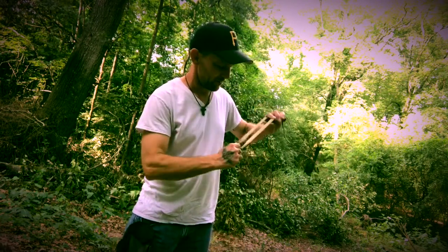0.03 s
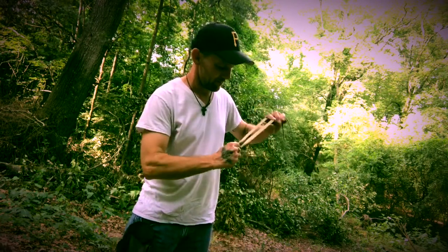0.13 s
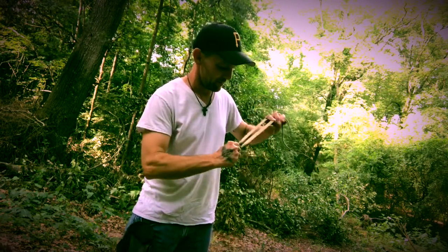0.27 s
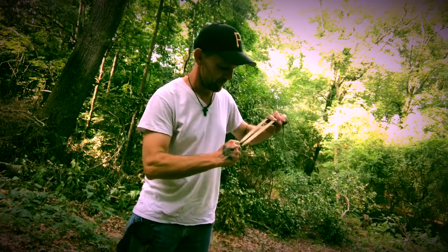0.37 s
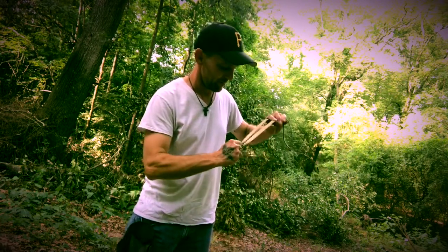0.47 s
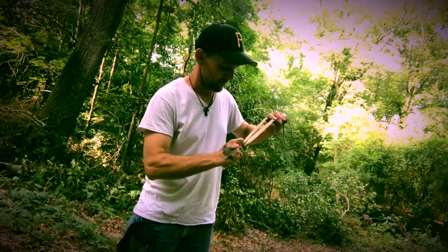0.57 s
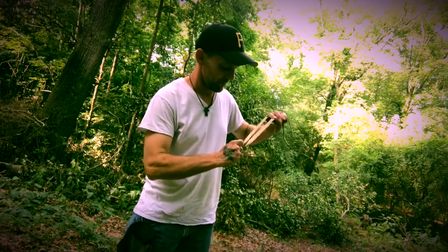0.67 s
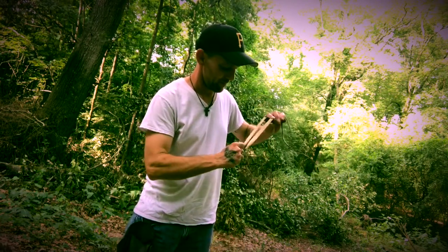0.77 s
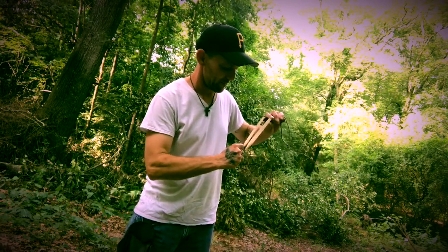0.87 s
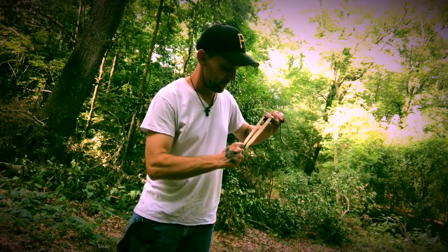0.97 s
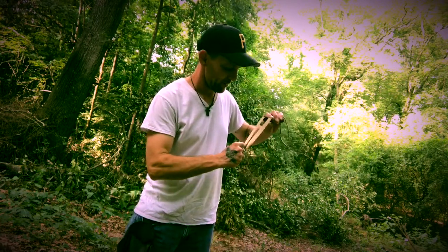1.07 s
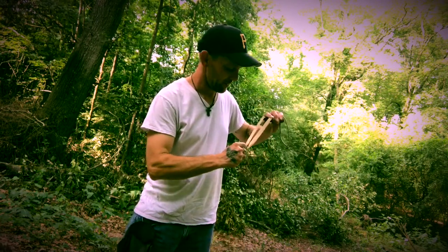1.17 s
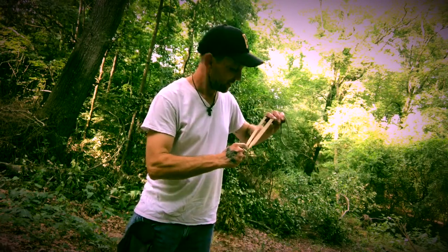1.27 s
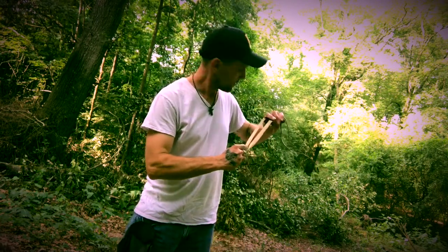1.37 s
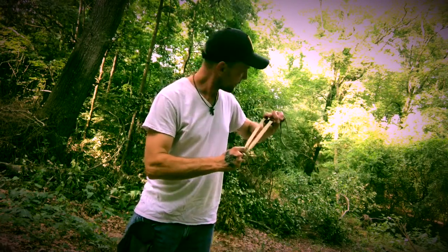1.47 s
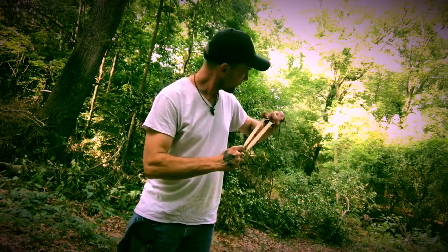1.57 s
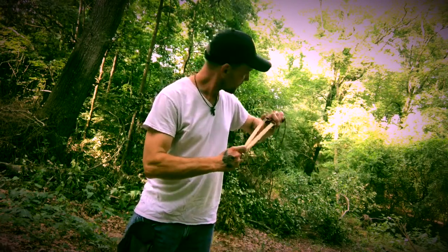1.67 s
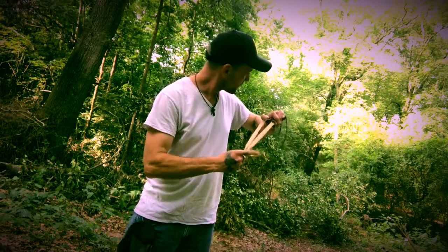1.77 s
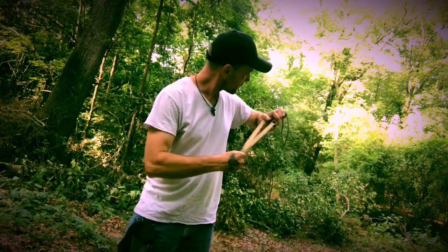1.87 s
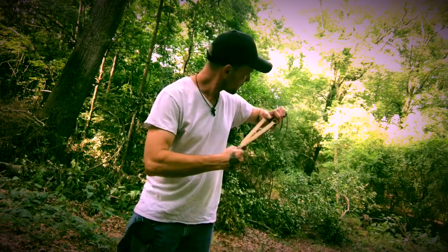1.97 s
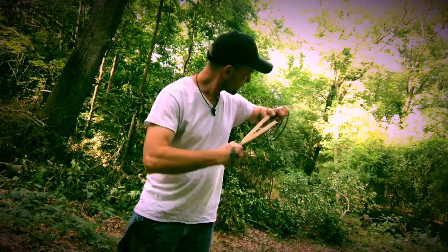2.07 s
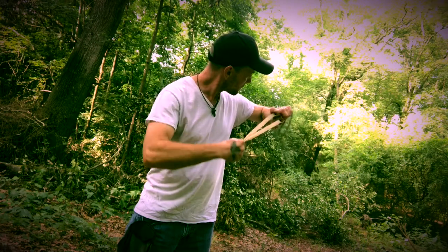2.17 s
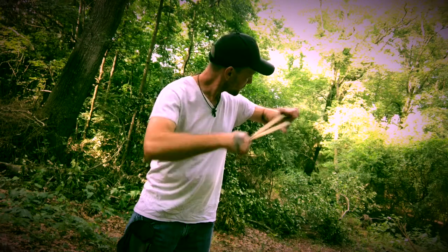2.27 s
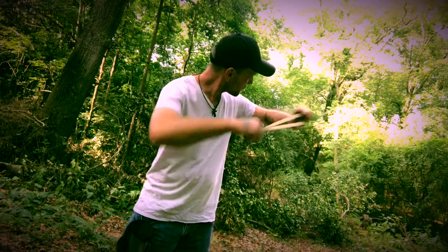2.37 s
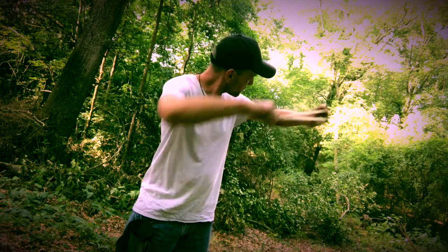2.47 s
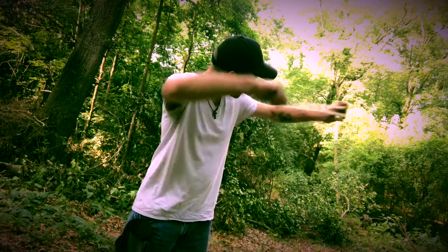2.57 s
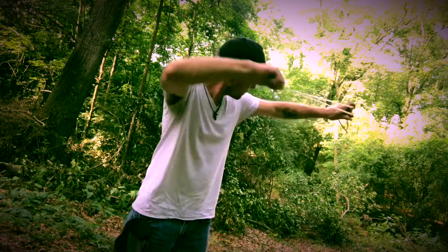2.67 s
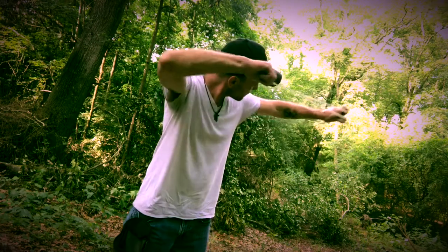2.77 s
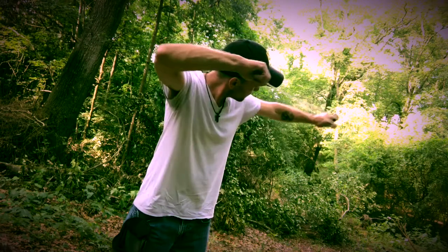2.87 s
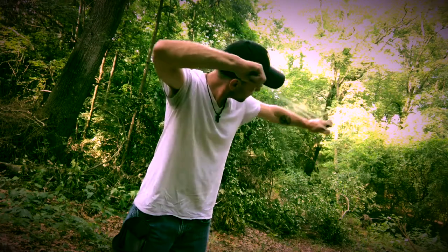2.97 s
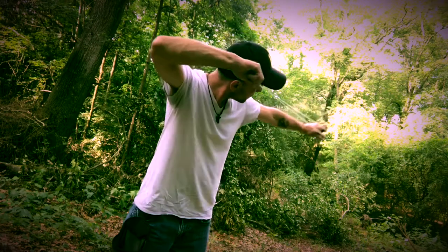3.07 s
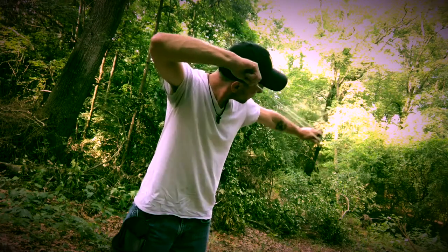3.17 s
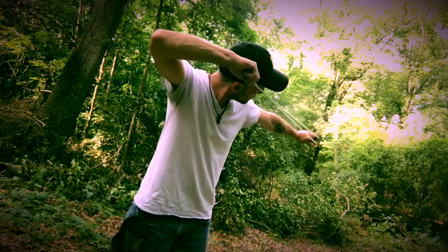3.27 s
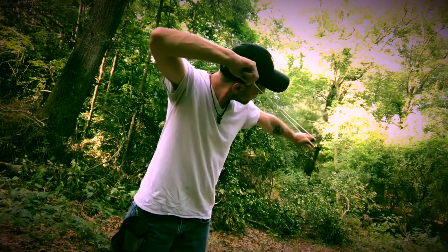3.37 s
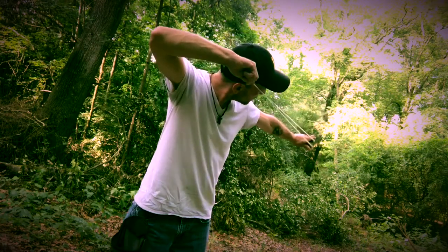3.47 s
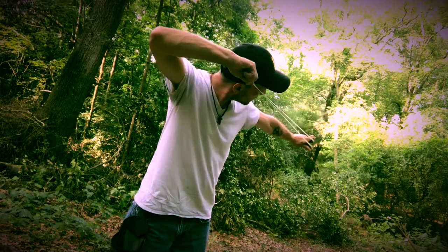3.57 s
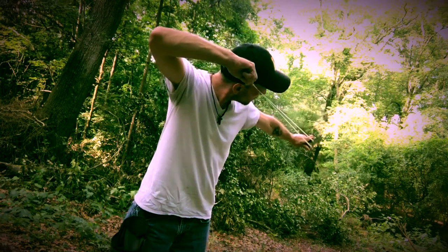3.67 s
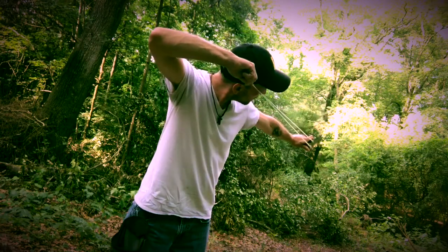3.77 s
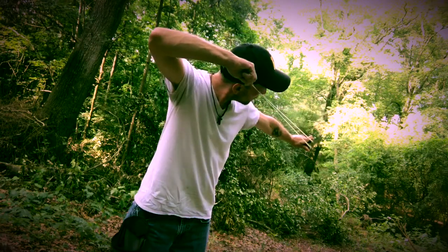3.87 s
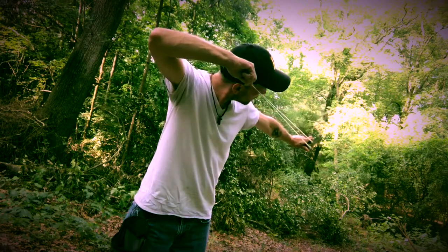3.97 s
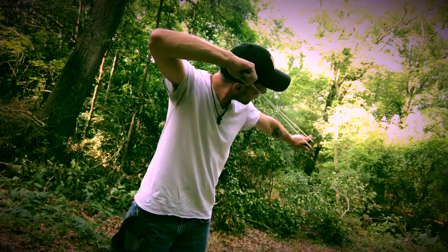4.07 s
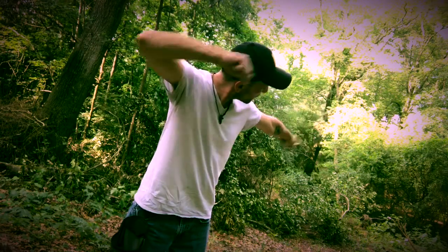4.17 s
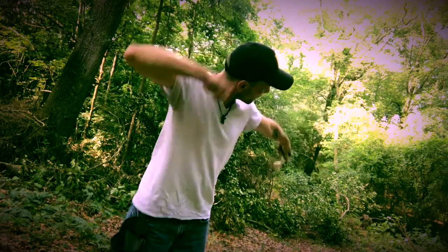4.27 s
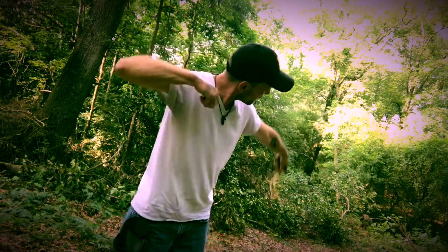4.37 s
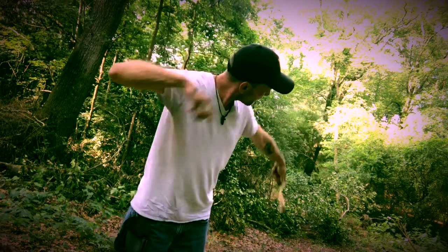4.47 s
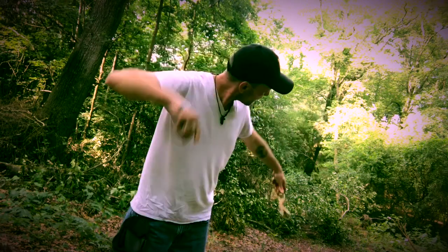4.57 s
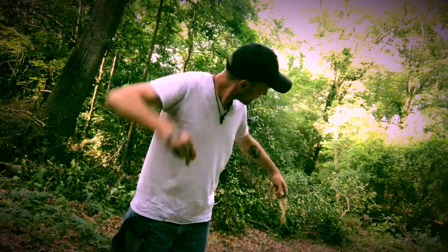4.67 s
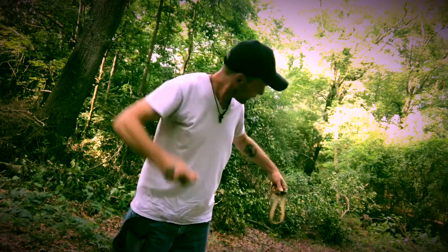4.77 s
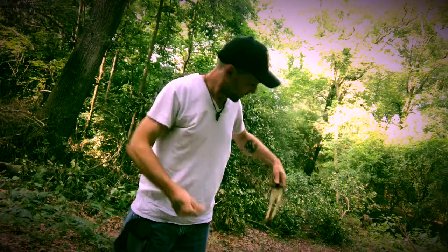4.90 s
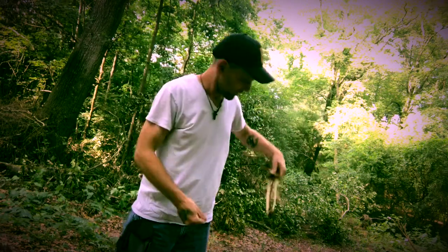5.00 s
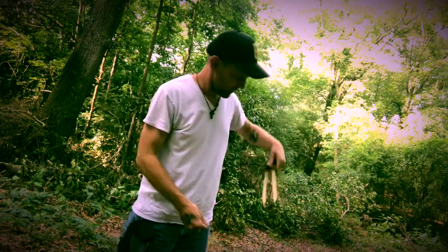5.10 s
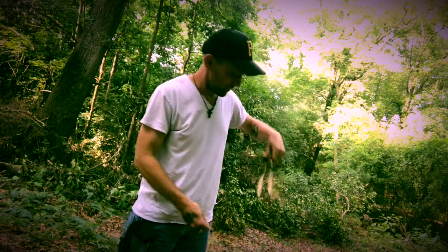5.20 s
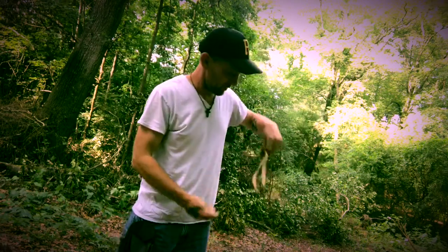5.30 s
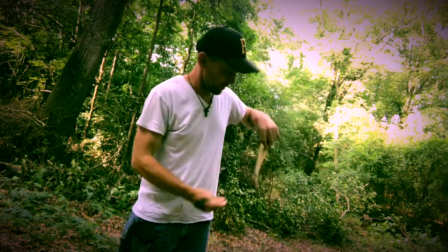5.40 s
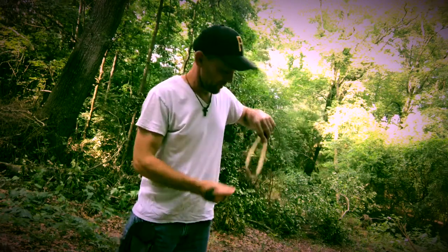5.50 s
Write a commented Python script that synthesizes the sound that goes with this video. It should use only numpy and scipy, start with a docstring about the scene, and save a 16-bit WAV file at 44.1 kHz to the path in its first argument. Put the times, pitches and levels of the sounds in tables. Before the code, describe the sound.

Faint leaf hiss and repeated raspy bird calls, then a sharp rubber-band snap and, a fifth of a second later, a metallic crack with scattered woodland echo.

```python
"""Slingshot and can in the woods

A slingshot is let go: the pouch clicks open, the rubber bands slap through the fork and whip back (short damped
tones and bursts of noise). A fifth of a second later the ball cracks into a far metal can, a set of damped tones
under a burst of noise, and its ring scatters among the trees as shaped noise. A distant bird repeats a hoarse
two-note call (shaking sines with breath) over leaf hiss and a low far rumble (coloured noise) and drone (sines)."""
import sys
import numpy as np
from scipy import signal
from scipy.fft import rfft, irfft, next_fast_len
from scipy.io import wavfile
from scipy.ndimage import map_coordinates

SR = 44100
rng = np.random.default_rng(int(sys.argv[2]) if len(sys.argv) > 2 else 0)


def ratio(d):
    """dB to gain"""
    e = np.asarray(d, float) / 20
    return 10 ** e


def wav_out(sig):
    """Save sig, one row per channel (or a flat mono array), as 16-bit PCM at SR to the path in sys.argv[1]."""
    wavfile.write(sys.argv[1], SR, np.round(np.clip(np.atleast_2d(sig).T, -1, 1) * 32767).astype(np.int16))


N = 244314  # length of the scene in samples
TIME = np.arange(SR // 4) / SR  # a quarter second clock for short sounds, s
HIT_S = 4.4262  # the ball meets the can

# Everywhere below, t60 is the time in which a sound falls by 60 dB.
# the three stages of the shot, release, slap through the fork, whip back:
# t/s, air noise level/dB, its rise time/s, its t60/s, echo level before scattering/dB
STAGES = [(4.175, -37, .001, 0.1, -53.5), (4.193, -26, .004, 0.055, -52),
          (4.222, -26.5, 0.0046, 0.052, -47.5)]


def unit(x):
    """Scales a sound to an rms (average strength) of 1."""
    return x / np.sqrt(np.mean(x ** 2) + 1e-20)


def along(points, hz):
    """Reads a curve of (Hz, value) points at any frequency, on a log frequency axis."""
    f, v = np.transpose(points)
    return np.interp(np.log(hz + 1), np.log(f + 1), v)


def noise(spectrum, size=N):
    """Noise of rms 1: white noise filtered to the given colour, so only relative levels count."""
    padded = next_fast_len(size + 8192)
    gain = ratio(along(spectrum, np.fft.rfftfreq(padded, 1 / SR)))
    white = rng.standard_normal(padded)
    return unit(irfft(rfft(white) * gain, padded)[:size])


def wobble(rate):
    """A smooth curve through random points, rate points a second."""
    knots = rng.standard_normal(int(N * rate / SR) + 4)
    return map_coordinates(knots, [np.arange(N) * rate / SR])


def ring(db, hz, t60, attack_s):
    """One way a struck thing can vibrate: a sine that starts quickly and dies away."""
    decay = ratio(db - 60 * TIME / t60)
    return decay * np.sin(2 * np.pi * hz * TIME) * (1 - np.exp(-TIME / attack_s))


def add(track, s, sound):
    """Mixes a sound into the track from time s."""
    part = track[round(s * SR):][:len(sound)]
    part += sound[:len(part)]


def woods():
    """Leaf hiss and a far rumble: two coloured noises whose levels waver slowly."""
    # colour of the far rumble: f/Hz, relative level per Hz/dB
    rumble_colour = [(28, -18), (40, -11.5), (47, 1.5), (55, 3.5), (67, -1), (83, 3.5), (100, 0.5),
                     (120, -10.5), (140, -5.5), (170, -10), (195, -11), (230, -26), (300, -44.5)]
    # colour of the leaf hiss: f/Hz, relative level per Hz/dB
    leaf_colour = [(120, -26), (200, -4.5), (241, -6.5), (342, -8.5), (494, -5.5), (562, -8.5), (742, -11),
                   (1320, -12.5), (1940, -15.5), (3700, -17.5), (4970, -23), (6090, -22), (10400, -35),
                   (12500, -35), (15500, -37.5), (16200, -45)]
    rumble_db, leaves_db = -57.5, -61.5  # middle levels
    rumble = ratio(rumble_db + 0.6 * wobble(6.2) + 0.4 * wobble(1.8)) * noise(rumble_colour)
    leaves = ratio(leaves_db + 0.31 * wobble(2.4) + 0.69 * wobble(14)) * noise(leaf_colour)
    return rumble + leaves


def drone():
    """Far low tones: multiples of an engine's firing rate, wavering in level, and two hums, one fading, one growing."""
    # tones of the engine: multiple of the firing rate, middle peak level/dB
    engine_tones = [(2, -68), (4, -62), (5, -68), (6, -67), (7, -69), (8, -68), (9, -74)]
    # two wavering low tones, one fading, one growing: middle f/Hz, first peak level/dB, last peak level/dB
    hum_tones = [(55, -58, -65), (82, -63, -56.5)]
    firing_hz = 25.47  # middle firing rate of a far engine
    seconds = np.cumsum(1 + 0.003 * wobble(1.5)) / SR  # a clock that runs slightly unevenly
    out = np.zeros(N)
    for multiple, db in engine_tones:
        level = ratio(db + 1.3 * wobble(4.4))
        turns = multiple * firing_hz * seconds + rng.random()
        out += level * np.sin(2 * np.pi * turns)
    for hz, first_db, last_db in hum_tones:
        level = ratio(np.linspace(first_db, last_db, N) + 2.5 * wobble(3))
        turns = np.cumsum(hz + 1.803 * wobble(3)) / SR
        out += level * np.sin(2 * np.pi * turns)
    return out


def bird():
    """Hoarse two-note calls: a sine whose pitch and level shake quickly, with throat noise around it."""
    # the calls: t/s, low note level/dB, low note f/Hz, high note level over the low note/dB
    calls = [(.33, -68, 1310, -1), (0.841, -66, 1333, -1), (1.36, -65, 1350, -4), (1.93, -64, 1333, -4.5),
             (2.519, -65.5, 1295, -5), (2.869, -73.5, 1383, -20), (3.23, -65.5, 1312, -3.5),
             (3.95, -67.5, 1297, 0.5), (4.949, -65.5, 1320, -0.5), (5.489, -65.5, 1245, 0)]
    # breath in the bird's throat: f/Hz, relative level per Hz/dB
    breath_colour = [(900, -38.5), (1150, -5.5), (1350, -1), (1600, -1), (1900, -4), (2300, -42)]
    low_s, scoop_hz, scoop_s, low_sag_hz = 0.125, 150, 0.02, 70  # length, scoop up and its time, fall by the end
    high_after_s, high_s = 0.105, 0.11  # start of the high note after the low one, its length
    high_hz, high_sag_hz = 1758, 257.6  # first pitch of the high note, its fall by the end
    out = np.zeros(N)
    shake, hoarse, breath = wobble(70), wobble(60), noise(breath_colour)
    low_bend = -scoop_hz * np.exp(-TIME / scoop_s) - low_sag_hz * np.clip(TIME / low_s, 0, 1) ** 2
    high_pitch = high_hz - high_sag_hz * (1 - np.clip(1 - TIME / high_s, 0, 1) ** 2)
    for s, db, low_hz, high_db in calls:
        # start/s, length/s, pitch/Hz, level/dB, breath level relative to the note/dB
        notes = ((s, low_s, low_hz + low_bend, db, -5),
                 (s + high_after_s, high_s, high_pitch, db + high_db, -1))
        for start, length, pitch, note_db, breath_db in notes:
            progress = np.clip(TIME / length, 0, 1)
            swell = np.abs(np.sin(np.pi * progress ** 0.88)) ** 0.68
            at = np.minimum(round(start * SR) + np.arange(len(TIME)), N - 1)
            phase = 2 * np.pi * np.cumsum(pitch + 30 * shake[at]) / SR
            tone = np.sqrt(2) * ratio(3 * hoarse[at]) * np.sin(phase)
            add(out, start, ratio(note_db) * swell * (tone + ratio(breath_db) * breath[at]))
    return out


def scatter(sound, early_db, swell_s):
    """Shapes a second of sound as scatter from trunks: near ones die fast, far ones by frequency."""
    # how long the echo lasts among the trunks: f/Hz, t60/s
    trunk_decay = [(300, .5), (1000, 1.41), (3300, 1.05), (7000, 0.89), (15000, .55)]
    hz, t, cells = signal.stft(sound, SR, nperseg=256)
    late = ratio(-60 * t / along(trunk_decay, hz)[:, None])
    early = ratio(early_db - 60 * t / 0.26)
    tail = signal.istft(cells * (late + early), SR, nperseg=256)[1][:SR]
    return tail * (1 - np.exp(-np.arange(SR) / SR / swell_s))


def trees(x, gap_s):
    """A far call smeared by the trunks: each moment of it is spread into scattered noise."""
    tail = scatter(rng.standard_normal(SR), early_db=5.0, swell_s=0.015)
    late = np.pad(x, (round(gap_s * SR), 0))
    return signal.fftconvolve(late, tail / np.linalg.norm(tail))[:N]


def ticks():
    """Faint twig ticks: tiny tones that die within milliseconds."""
    # the ticks: t/s, level/dB, f/Hz
    twig_ticks = [(1.027, -50, 13000), (2.979, -43, 4000), (5.21, -51.5, 13500)]
    out = np.zeros(N)
    for s, db, hz in twig_ticks:
        add(out, s, ring(db, hz, 0.0031, attack_s=0.00018))
    return out


def air_level():
    """Strength of the bands' whirr: each stage rises up to its moment, then dies away."""
    t = np.arange(N) / SR
    level = np.zeros(N)
    for s, db, rise_s, t60, _ in STAGES:
        rise = np.exp(np.minimum(t - s, 0) / rise_s)
        fall = ratio(-60 * np.maximum(t - s, 0) / t60)
        level += np.where(t < s, rise, fall) * ratio(db)
    return level


def bands():
    """Each contact is a short damped pop plus a rasp of rubber; the slack bands whirr and flap."""
    # the clearest band contacts: t/s, ring level/dB, ring f/Hz, ring t60/s,
    # rasp level/dB (its swell peaks 3.5 dB higher)
    slaps = [(4.162, -34, 3500, 0.0036, -52), (4.1732, 1.5, 3510, 0.0015, -19),
             (4.1740, -13, 2290, .003, -39), (4.1893, -16.5, 1507, .004, -34.5),
             (4.1901, -29, 12000, 0.012, -23), (4.1920, -5, 1706, 0.0044, -28.5),
             (4.1925, -2, 5530, .001, -28.5), (4.2005, -12.5, 1500, .005, -34.5),
             (4.2190, -24, 2500, 0.012, -22.5), (4.2208, -2, 3620, .007, -17),
             (4.221, -12, 6500, .006, -24.5), (4.2290, -24, 6240, .005, -32.5)]
    # rubber on rubber: f/Hz, relative level per Hz/dB
    rasp_colour = [(150, -6), (1000, -6), (3500, -5), (6500, -4), (9000, -8), (14000, -8), (16000, -16.5),
                   (17000, -39)]
    rasp_share = 0.2  # time scale of a rasp as a share of the ring's t60
    # small flaps: middle pitch, its log spread, level over the air noise, t60
    flap_hz, flap_spread, flap_db, flap_t60_s = 2500, 0.59, 7.5, 0.0044
    whirr = air_level()
    out = whirr * ratio(0.89 * wobble(500)) * noise(rasp_colour)
    for s, db, hz, t60, rasp_db in slaps:
        u = TIME / (rasp_share * t60)
        swell = np.sqrt(u) * np.exp(1 - u * u)
        rasp = ratio(rasp_db) * swell * noise(rasp_colour, size=len(TIME))
        add(out, s, ring(db, hz, t60, attack_s=0.0001) + rasp)
    # twelve flaps between the release and the last contact, each a little late at random
    flap_times = np.linspace(STAGES[0][0], slaps[-1][0], num=12) + rng.uniform(0, 0.005, size=12)
    for s, (pitch, size) in zip(flap_times, rng.standard_normal(size=(12, 2))):
        hz = min(flap_hz * np.exp(flap_spread * pitch), SR / 3)
        flap = ring(flap_db + 3 * size, hz, flap_t60_s, attack_s=0.0001)
        add(out, s, whirr[round(s * SR)] * flap)
    return out


def band_echoes():
    """Every trunk faces another side of the bands, so their echo is noise with the snap's mean colour."""
    # the snap as the trunks return it: f/Hz, relative level per Hz/dB
    snap_colour = [(240, -41), (400, -13.5), (439, -14), (505, -9.5), (1670, -13), (3650, -2), (7230, -0.5),
                   (15000, -13.5), (16500, -23)]
    out = np.zeros(N)
    for s, *_, db in STAGES:
        add(out, s, ratio(db) * scatter(noise(snap_colour, size=SR), early_db=2.0, swell_s=0.004))
    return out


def fork():
    """The fork thumps in the hand: low tones, damped quickly."""
    # the thumps: t/s, level/dB, f/Hz, t60/s
    thumps = [(4.192, -28, 354.5, 0.088), (4.195, -33.5, 430, 0.05), (4.2, -28.5, 165, .035),
              (4.221, -29, 590, .03)]
    out = np.zeros(N)
    for s, db, hz, t60 in thumps:
        add(out, s, ring(db, hz, t60, attack_s=0.002))
    return out


def can():
    """The ball rings the thin wall under a crack; the dent damps the vibrations fast."""
    # vibrations of the can's wall: f/Hz, level/dB, t60/s (held to 0.14 s at most below)
    wall_modes = [(615, -37.5, 0.097), (794, -38, 0.16), (1000, -35, 0.09), (994, -17.5, 0.087),
                  (1062, -20.5, 0.078), (1190, -22, 0.065), (1390, -22, 0.066), (1596, -32.5, 0.14),
                  (1870, -36, .05), (1970, -30, 0.07), (2160, -28, .04), (2446, -29, 0.1),
                  (2620, -31, 0.12), (2880, -29, 0.081), (3020, -20, 0.052), (3230, -23.5, 0.081),
                  (3440, -23, 0.052), (3830, -40, 0.022), (3950, -29, 0.065), (4490, -24.5, .04),
                  (4680, -19, 0.026), (5680, -18, 0.037), (5950, -24, .04), (6600, -23.5, 0.047),
                  (7250, -42, .04)]
    # the ball denting the wall: f/Hz, relative level per Hz/dB
    crack_colour = [(300, -47), (800, -23), (1000, 4.5), (3000, 0), (6000, -2), (8000, -3.5), (11000, -7),
                    (14500, -8.5), (16200, -25), (17000, -46)]
    out = np.zeros(N)
    modes = np.zeros(len(TIME))
    for k, (hz, db, t60) in enumerate(wall_modes):
        modes += (-1) ** k * ring(db, hz, min(t60, 0.14), attack_s=0.0012)  # every other one is flipped
    rise = 1 - np.exp(-TIME / 0.00018)
    decay = ratio(-14.5 - 60 * TIME / 0.02) + ratio(-28 - 60 * TIME / 0.052)  # a fast part and a slower one
    crumple = ratio(2.9 * wobble(1500)[:len(TIME)])  # the wall buckles in small jerks
    add(out, HIT_S, modes + rise * decay * crumple * noise(crack_colour, size=len(TIME)))
    return out


def can_echoes():
    """The trunks return the hit as scattered noise, some of the can's vibrations lingering as narrow bands in it."""
    # the hit as the trunks return it: f/Hz, relative level per Hz/dB
    hit_colour = [(290, -50), (500, -17), (850, -17.5), (980, -10), (1800, -11), (2500, -6), (3800, -7.5),
                  (6660, -8), (10000, -16.5), (15100, -22.5), (15800, -28.5), (16500, -49.5)]
    # can vibrations heard in the echo: f/Hz, width/Hz, level before scattering/dB
    lingering = [(1019, 95, -50), (1223, 54, -52), (1416, 50, -57), (1614, 55, -57), (1855, 40, -60),
                 (2040, 40, -55.5), (3340, 220, -48), (6600, 120, -55)]
    echo_db, echo_lag_s = -37.5, 0.005  # level before scattering, delay
    far_s, far_db = 0.22, -14.5  # a second wave of the ring from a far line of trees
    out = np.zeros(N)
    hit = scatter(noise(hit_colour, size=SR), early_db=-2.0, swell_s=0.0049)
    add(out, HIT_S + echo_lag_s, ratio(echo_db) * hit)
    narrow = np.zeros(SR)
    for hz, width, db in lingering:
        colour = [(hz - 2 * width, -60), (hz - width / 2, 0), (hz + width / 2, 0), (hz + 2 * width, -60)]
        narrow += ratio(db) * noise(colour, size=SR)
    back = scatter(narrow, early_db=-8, swell_s=0.01)
    add(out, HIT_S, back)
    add(out, HIT_S + far_s, ratio(far_db) * back)
    return out


def thin_hiss():
    """A thin treble hiss from 4.43 s: noise that fades to a steady level, then ends abruptly."""
    # colour of the hiss: f/Hz, relative level per Hz/dB
    hiss_colour = [(3000, -32), (7000, -2), (11000, -3.5), (15500, -6), (16500, -30)]
    start_db, t60_s, hold_db, end_s = -58, 0.9, -70, 4.83  # first level, decay, steady level, end
    t = np.arange(N) / SR
    hiss_db = np.maximum(start_db - 60 * (t - HIT_S) / t60_s, hold_db)
    return (t > HIT_S) * (t < end_s) * ratio(hiss_db) * noise(hiss_colour)


def scene():
    """Adds up the bird with its smear among the trees, the slingshot and can with their echoes, and the woods."""
    call = bird()
    call = call + ratio(-9.0) * trees(call, gap_s=0.01)
    shot_and_hit = bands() + fork() + can() + band_echoes() + can_echoes()
    background = woods() + thin_hiss() + ticks() + drone()
    return (call + shot_and_hit + background)[None]


def band_limit(x):
    """A steep low-pass at the top of the band."""
    return signal.sosfilt(signal.butter(12, 16810, fs=SR, output="sos"), x)


def record(dry):
    """A small camera microphone: filters make it deaf to the deepest bass and the highest treble."""
    no_bass = signal.butter(2, 42, "high", fs=SR, output="sos")
    no_top = signal.cheby1(10, 0.5, 16300, fs=SR, output="sos")
    heard = signal.sosfilt(no_top, signal.sosfilt(no_bass, dry))
    return band_limit(heard)


dry = scene()
out = record(dry)
wav_out(out)
```